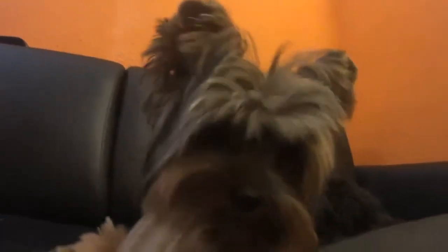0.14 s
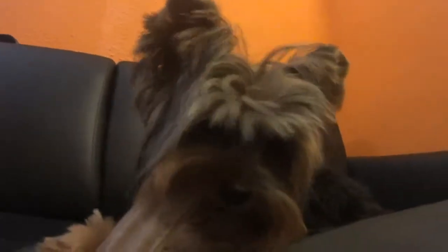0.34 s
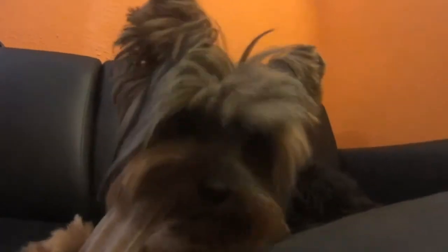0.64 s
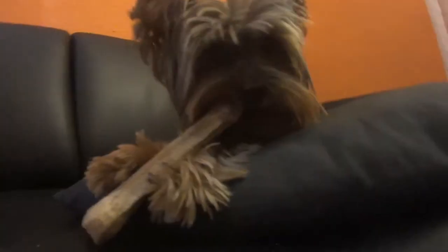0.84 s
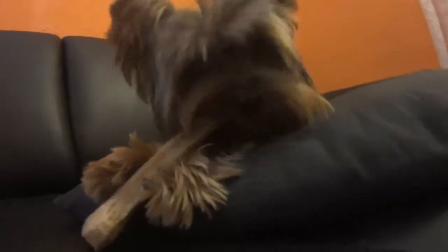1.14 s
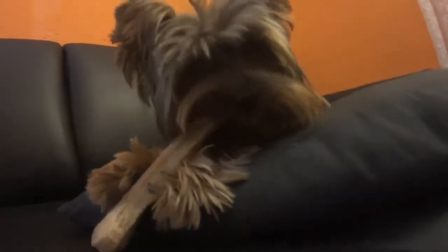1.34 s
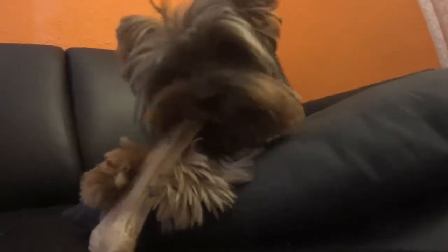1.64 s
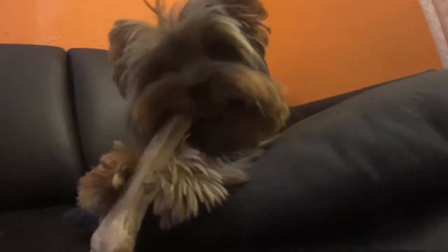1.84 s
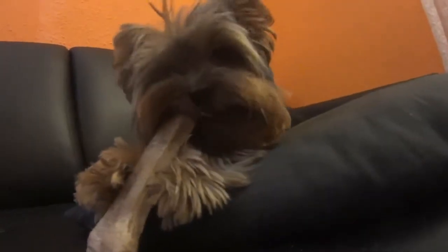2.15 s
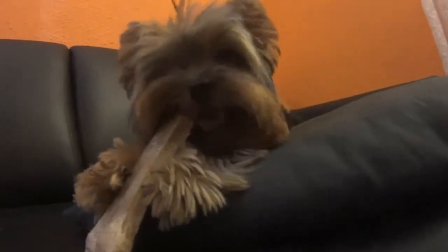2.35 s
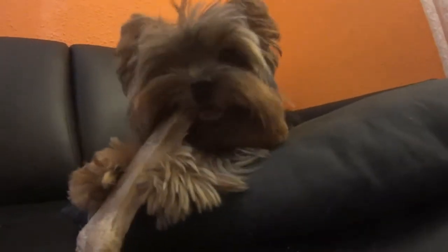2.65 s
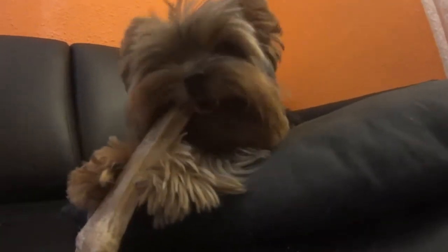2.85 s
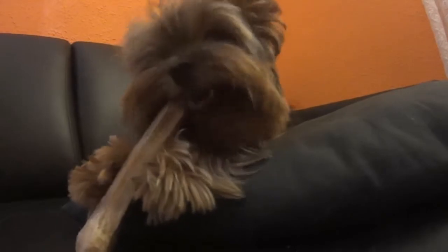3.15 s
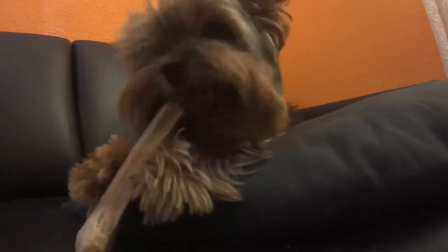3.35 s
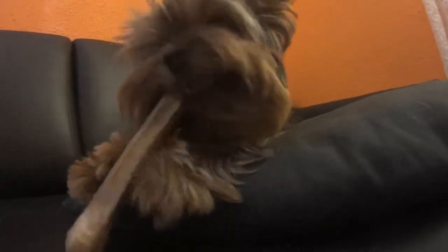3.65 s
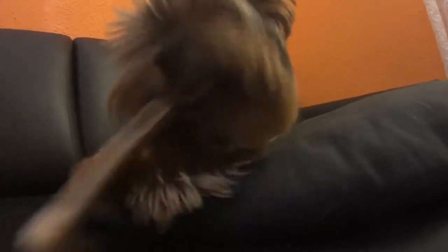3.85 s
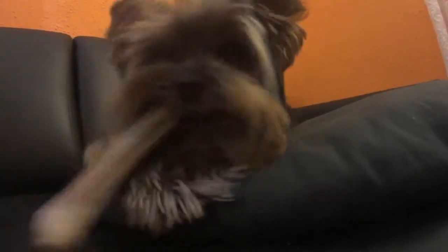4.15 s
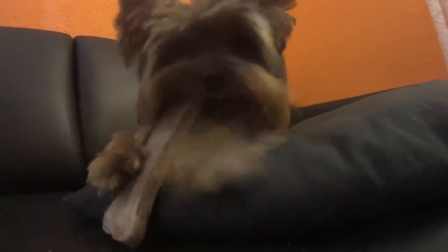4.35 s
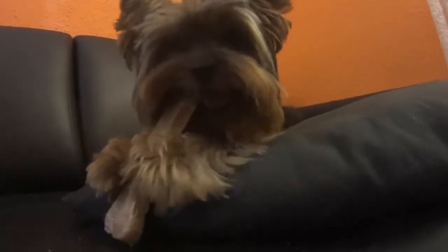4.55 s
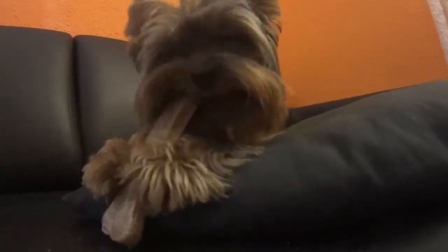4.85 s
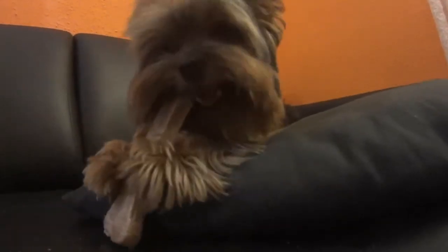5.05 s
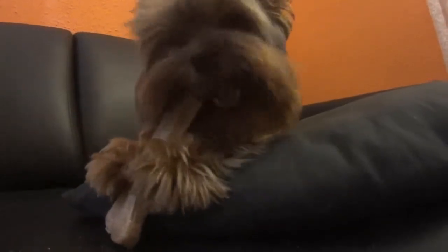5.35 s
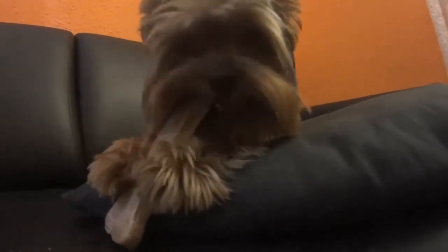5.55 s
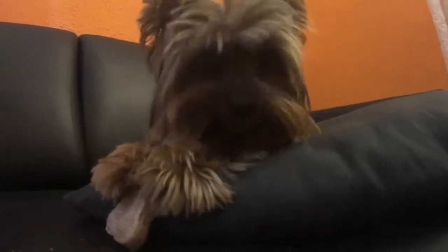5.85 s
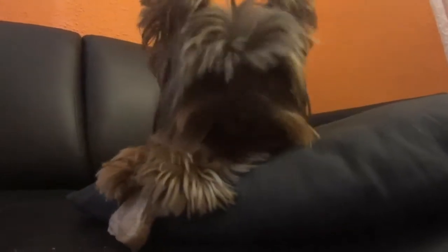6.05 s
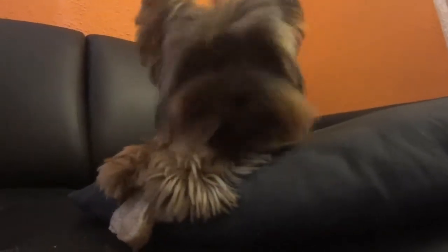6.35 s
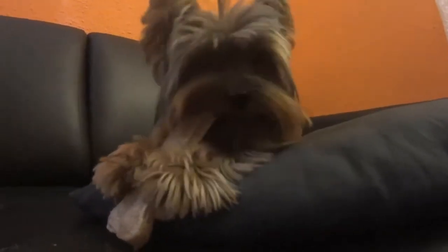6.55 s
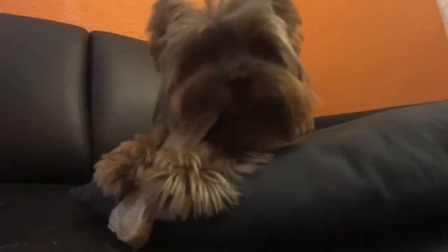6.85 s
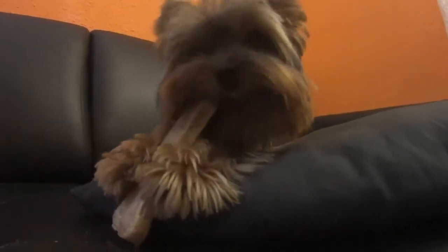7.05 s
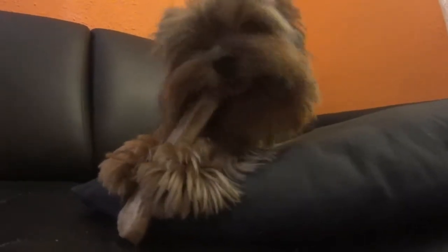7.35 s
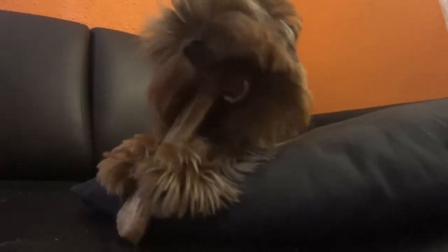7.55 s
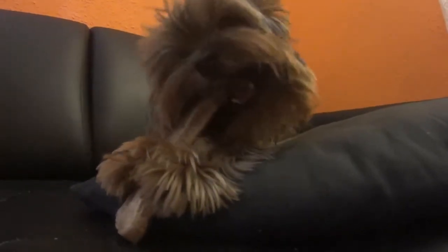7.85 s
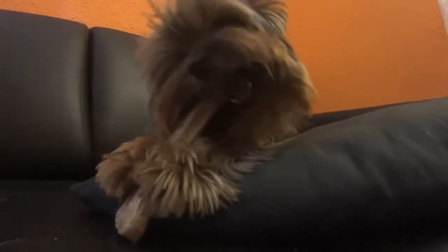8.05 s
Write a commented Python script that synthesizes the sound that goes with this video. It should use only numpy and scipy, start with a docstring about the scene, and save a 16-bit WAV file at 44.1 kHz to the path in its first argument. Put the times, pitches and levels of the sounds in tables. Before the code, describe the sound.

Close, dry tooth clicks and short scrapes on a hard bone, with occasional woody knocks, soft cushion bumps and a constant faint room hiss.

```python
"""On a leather sofa, a small dog gnaws a hard chew bone close by.
Teeth click and grind on the bone: each contact is a few fast cycles that die away at once.
The bone knocks when it slips, made from dying tones. Fur rustles and the cushion rumbles, made
from shaped noise, and soft bumps are short low waves. A steady hiss lies under everything."""
import sys
import numpy as np
from scipy import signal
from scipy.io import wavfile
from scipy.ndimage import uniform_filter1d

SR = 44100
rng = np.random.default_rng(int(sys.argv[2]) if len(sys.argv) > 2 else 0)


def dump(signal):
    """Clip the signal to [-1, 1] and save it as 16-bit WAV at the path in sys.argv[1]."""
    limited = np.clip(np.atleast_2d(signal).T, -1, 1)
    pcm = np.round(limited * 32767).astype(np.int16)
    wavfile.write(sys.argv[1], SR, pcm)


N = 361747  # length in samples

# Steady hiss of the room and the microphone. Each row: pitch in Hz, relative level in dB per Hz.
HISS_SPECTRUM = [(30, -2.5), (130, -18), (300, -12), (640, -11.5), (1000, -11), (1280, -7), (1500, -11),
                 (1950, -9), (2400, -4.5), (2900, -10), (3600, -16), (4900, -16.5), (7100, -24.5),
                 (11000, -25.5)]
HISS_DB = -51.5  # middle of the left and right levels
# How alike left and right are in all noises. Each row: pitch in Hz, likeness from -1 to 1.
LEFT_RIGHT_LIKENESS = [(25, 1), (60, 0.8), (110, 0.88), (190, 0.53), (340, -0.24), (610, -0.556),
                       (1090, -0.092), (1940, 0.54), (4000, 0.393), (11000, 0.467)]

# The dog shifts its weight. Each row: time in seconds, cushion rumble level in dB.
WEIGHT_SHIFTS = [(0.0, -66), (0.84, -71.5), (1.12, -59), (1.55, -62), (2.08, -66.5), (3.3, -59),
                 (4.11, -59.5), (4.61, -72), (5.02, -58.5), (5.3, -64.5), (6.51, -64.5), (6.69, -67.5),
                 (7.54, -62), (7.9, -81), (8.2, -62)]
# Colour of the cushion rumble. Each row: pitch in Hz, relative level in dB per Hz.
RUMBLE_SPECTRUM = [(15, -8.5), (40, -6.5), (100, -7), (220, -9), (350, -17), (700, -79)]
# Paws and chest bump softly into the cushion. Each row: start in seconds, level in dB, pitch in Hz.
CUSHION_BUMPS = [(0.499, -53, 79), (0.617, -53, 57.8), (0.804, -53, 88.8), (1.159, -47.5, 32.3),
                 (1.329, -51, 43.1), (1.839, -54, 40.3), (2.069, -48.5, 133), (2.179, -58, 141),
                 (2.895, -51, 45.8), (3.005, -57, 61.9), (3.181, -47, 33.5), (3.356, -50, 48.4),
                 (3.508, -48, 59.2), (3.898, -48, 95), (4.457, -48.5, 109.5), (4.832, -52, 70.0),
                 (5.175, -45, 149.4), (5.561, -46.5, 60.5), (6.217, -53, 113), (6.524, -52, 102),
                 (6.592, -49, 137), (6.893, -55, 54.3), (7.271, -55, 117.5), (7.388, -49, 89),
                 (7.589, -48.5, 118), (8.159, -52, 59.2)]
BUMP_RISE_TURNS = 0.66  # cycles until the swell of a bump is at its top

# Fur and paws drag on leather. Each row: loudest moment in seconds, swell in seconds,
# fade in seconds, level in dB, brightness from 0 to 1.
LEATHER_RUBS = [(.894, 0.009, .035, -46.5, 0), (1.0, 0.14, 0.27, -52, 0), (1.3, 0.06, 0.046, -44.5, 0.03),
                (1.351, .035, 0.042, -44.5, 0.05), (3.89, 0.076, 0.092, -49.5, 0.92),
                (4.005, 0.068, 0.0926, -37.5, 0.87), (4.325, 0.13, 0.084, -40.5, 0.9),
                (4.39, 0.057, 0.197, -48.5, 0.88)]
# Colour of a dull rub. Each row: pitch in Hz, relative level in dB per Hz.
DULL_RUB_SPECTRUM = [(100, -4), (200, -9), (500, -13.5), (900, -5), (1500, -5.5), (2000, -9), (3000, -26),
                     (6000, -19), (11000, -52)]
# Colour of a bright rub. Each row: pitch in Hz, relative level in dB per Hz.
BRIGHT_RUB_SPECTRUM = [(80, -35), (150, -1.5), (300, -15), (560, -6.5), (940, -33), (1900, -7.5),
                       (2400, 0.5), (2900, -9), (6300, -15), (11000, -28)]
RUB_ENDS_DB, RUB_BEND = -13, 1.5  # both ends of a rub against its top in dB, roundness of the top

# The bone knocks. Each row: start in seconds, thump level in dB, factor on the thump's pitches,
# then the levels of the hollow ring, the clack and the tick in dB against the thump.
BONE_KNOCKS = [(0.093, -41.5, 0.84, -20, -24, -22), (.886, -53.5, 1.22, 5.5, -1, -7),
               (1.025, -49, 1.246, -11, -20, -20), (1.471, -44, 1.43, -4, -9.5, -17),
               (1.7451, -27.5, 0.96, -4, 2, -8), (1.759, -27, 0.75, -16.5, -22.5, -28),
               (1.7683, -48.5, 1.21, -6, 6, -12), (2.62, -41, 1.14, -33, -22, -12),
               (2.627, -42, 1.16, -31.5, -20, -10.5), (3.643, -43, 1.13, -29, -12, -1.5),
               (3.835, -52.5, 1.45, 4, -17, -8), (3.979, -44, 1.4, -20, -15, -10),
               (4.0, -34.5, 1.2, -22, 9, 5.5), (4.013, -46, 1.1, -20.5, -11, -6.5),
               (4.0191, -24.5, 1.075, -34.5, -5, -6), (4.0327, -31, 1.2, -13, -23.5, -7.5),
               (4.134, -44, 0.94, -11, -8, -14.5), (4.952, -47, 0.47, 4, 10.5, -3),
               (5.419, -41, 0.694, -26, -21, -13), (5.815, -25, 1.012, 0.5, -18, -5),
               (5.8252, -44, 1.4, 6, 5, -14), (5.831, -29, 0.9, -17, -12, -28),
               (6.0108, -27.5, 0.99, 0, -9, -10), (6.3448, -22, 0.91, -4, -9.5, -6.5),
               (6.356, -41.5, 0.49, -2.5, -12, -22)]
# Tones of a knock, from low to high, before a knock's own pitch factor. Each row: pitch in Hz,
# level in dB, time to fall by 60 dB in seconds, left over right in dB, left ahead of right in radians.
THUMP_TONES = [(69, -13.5, 0.081, 4.5, .1), (190.3, 11.5, 0.02, 4, 0.41), (239, 1.5, 0.024, -4, 2.2)]
HOLLOW_TONES = [(740, 3.5, 0.02, 8.35, 0.52), (829.4, 3.5, 0.0237, 4.3, 1.9), (935.4, -14, 0.043, 3, 1.4)]
CLACK_TONES = [(1142, -10, 0.0215, 1, 0.86), (1337, 2.5, 0.017, -2.03, 0.94)]
TICK_TONES = [(1874, 4, 0.012, 0, 1.22), (2290, 7, 0.0071, -8.5, 2.34), (2820, 11, 0.0034, -6, 0.114),
              (5330, 4.5, 0.00438, -1.02, .1)]

# How busy the mouth is. Each row: time in seconds, level of the faint ticks in dB.
MOUTH_BUSYNESS = [(0, -69.5), (.45, -63), (.75, -64), (.9, -73.5), (1.8, -60.5), (2.1, -69), (3.0, -63),
                  (4.2, -62), (5.3, -65), (5.9, -67.5), (7.4, -63), (7.7, -69), (8.2, -70)]
# Teeth grind along the bone. Each row: loudest moment in seconds, swell in seconds,
# fade in seconds, level in dB, ring of the mouth in Hz, spread of pitch from 0 to 1.
GRIND_STROKES = [(.38, 0.0128, .02, -51, 5500, .35), (.445, 0.011, 0.042, -60, 5500, .25),
                 (.518, 0.0205, .02, -54, 6100, 0.3), (.55, 0.036, 0.053, -57, 4900, 0.03),
                 (1.825, 0.016, 0.017, -54.5, 5460, 0.2), (2.19, 0.0066, 0.024, -52.5, 4160, 0.42),
                 (2.234, 0.0154, 0.02, -50, 4070, 0.36), (2.641, 0.0268, 0.016, -39.5, 3400, 0.33),
                 (3.022, .019, .013, -42, 3690, 0.35), (3.362, 0.026, 0.013, -47, 3930, 0.32),
                 (3.625, 0.0084, 0.014, -46, 5470, 0.34), (3.797, 0.0117, 0.013, -29, 5010, 0.1),
                 (3.817, 0.0052, .006, -36.5, 5450, 0.22), (3.896, .019, 0.024, -46.5, 4900, 0.4),
                 (3.985, 0.0324, 0.0323, -37.5, 3950, 0.43), (3.995, 0.0083, 0.0082, -36, 4500, 0.25),
                 (4.034, 0.0082, 0.0071, -39.5, 3500, 0.43), (4.38, .014, 0.03, -43, 4450, 0.45),
                 (4.458, 0.012, 0.022, -43, 5400, 0.27), (4.917, 0.015, 0.01, -49, 3530, 0.28)]
# Ends of a grinding stroke against its top in dB, and roundness of the top; flatter than a rub.
STROKE_ENDS_DB, STROKE_BEND = -12, 3.2
# Clear bites of teeth on bone. Each row: loudest moment in seconds, level in dB,
# ring of the mouth in Hz, sharp edge in dB against that ring.
TOOTH_CLICKS = [(.1275, -33.5, 4970, -7.5), (0.3759, -26.5, 5800, -4.5), (.3855, -27.5, 4660, -4),
                (.3972, -35.5, 7570, -11), (0.4446, -42.5, 5300, -9), (.4767, -42, 5080, -3),
                (0.5172, -34.5, 7800, -13), (.5225, -37, 4900, -20), (.5325, -39, 4800, -15),
                (.5412, -39, 4700, -25), (.5447, -38, 4700, -25), (.5527, -36, 4900, -3.5),
                (0.5602, -39, 4700, -25), (0.5682, -35, 4900, -12), (.5795, -34, 5100, -13.5),
                (.6186, -35.5, 5860, -21), (.627, -32.5, 4650, -21), (.6505, -40, 4600, -2),
                (.6741, -38.5, 4820, -6.5), (.7032, -36, 3700, -24), (.725, -39.5, 4300, -23),
                (.738, -45, 6910, -20), (.7458, -40.5, 4680, -20), (1.2707, -21.5, 4400, -25),
                (1.3667, -30.5, 5050, -10), (1.756, -35.5, 5200, 0), (1.9779, -38.5, 5100, -17),
                (2.0428, -34.5, 2050, -26), (2.0426, -36, 5200, -20), (2.1927, -36, 4300, -18),
                (2.2255, -34, 4360, -21.5), (2.3766, -27.5, 5000, -36), (2.413, -27.5, 5030, -17.5),
                (2.462, -24.5, 5300, 2), (2.5178, -34, 5100, -9), (2.5622, -24, 5140, -14),
                (2.594, -42.5, 4400, -25), (2.605, -25, 4300, -20), (2.6415, -18, 3100, -11),
                (2.7374, -24.5, 4420, -16), (2.8166, -36, 4760, -9), (2.8367, -35, 4660, -14),
                (2.8962, -26, 5030, -22), (2.906, -39.5, 5500, -22), (2.9309, -38, 5060, -22),
                (2.989, -40, 4600, -25), (3.013, -38, 4370, -21), (3.026, -27.5, 4860, -13),
                (3.073, -33, 3750, -25), (3.2358, -25, 4850, -20), (3.2873, -33, 4800, -27),
                (3.3661, -17.5, 3640, -14), (3.4553, -34.5, 4240, -1), (3.4683, -36, 4900, -18),
                (3.6258, -28, 6290, -14.5), (3.6393, -34, 5240, -12), (3.6493, -31, 3840, -12.5),
                (3.698, -19, 5000, -11.5), (3.701, -22, 6150, -14), (3.711, -29, 5300, -23),
                (3.7615, -29, 5450, -14.5), (3.7887, -21, 5500, -15), (3.7914, -14.5, 5100, -13),
                (3.794, -20, 5300, -2), (3.7963, -14, 5060, -7), (3.7994, -16, 5250, -10),
                (3.8036, -25.5, 5320, -7.5), (3.8078, -20.5, 5170, -12), (3.8106, -28, 5000, -13),
                (3.8145, -34.5, 6000, -14), (3.8804, -37, 8200, -1), (3.8986, -29, 5770, -17),
                (3.9224, -29.5, 4320, -26), (3.928, -37, 3900, -12), (3.974, -27, 5400, -20),
                (3.981, -22.5, 6450, -7), (3.989, -23, 4820, -22), (3.9958, -20.5, 5050, -16),
                (4.0106, -21.5, 5260, -18), (4.0182, -23, 2740, -25), (4.023, -23, 4520, -24.5),
                (4.0345, -30, 4620, -20), (4.1358, -38.5, 5270, -9.5), (4.1618, -41.5, 4900, -15),
                (4.3723, -33, 3000, -7.5), (4.3803, -28.5, 3550, -3), (4.5629, -33.5, 2650, -7.5),
                (4.6423, -39.5, 5940, 2), (4.7299, -42.5, 5100, 5), (4.8313, -21, 5256, -14.5),
                (4.8903, -23.5, 4500, -31), (4.901, -30, 4600, -25), (4.9224, -22.5, 4810, -19.5),
                (4.9233, -22.5, 3003, -30), (4.992, -38.5, 4600, -25), (5.003, -42, 4700, -25),
                (5.0729, -35.5, 3360, -23), (5.098, -40, 5200, 6.5), (5.22, -44.5, 5000, -20),
                (5.2768, -33, 4800, -16), (5.284, -41, 4470, -22), (5.3416, -37.5, 7000, -2),
                (5.716, -32, 3630, -7), (5.7811, -41.5, 7670, 4), (5.9085, -27, 5245, -30),
                (6.1554, -37, 4800, -24), (6.6068, -35, 5030, -24), (6.678, -33, 4640, -23),
                (6.677, -34.5, 2350, -22.5), (6.753, -43, 5070, -5), (6.918, -42, 5810, 7),
                (6.927, -36, 5140, -5), (7.0564, -35, 4650, -4), (7.1963, -33, 4440, -19),
                (7.2024, -36.5, 5810, -2), (7.3507, -33.5, 4920, -12), (7.367, -35.5, 3160, -21),
                (7.5465, -32, 3500, -13)]

EDGE_HZ = 11000  # the recorder keeps little above this


def gain_of(db):
    """Turns decibels into a multiplier."""
    return 10 ** (np.asarray(db) / 20)


def evened(x):
    """Scales a signal to an average strength (rms) of 1."""
    return x / np.sqrt(np.mean(x ** 2) + 1e-20)


def read(points, hz):
    """Reads a curve over pitch, with the pitch axis logarithmic as in hearing."""
    f, value = np.transpose(points)
    return np.interp(np.log(hz + 1), np.log(f + 1), value)


def level_over_time(points):
    """Gain that follows straight lines in dB between the given moments."""
    return gain_of(np.interp(np.arange(N) / SR, *np.transpose(points)))


def add(mix, s, sound):
    """Adds a sound into the mix from s seconds on, cut off at the end of the mix."""
    part = mix[..., round(s * SR):][..., :sound.shape[-1]]
    part += sound[..., :part.shape[-1]]


def scatter_in(length, at, sounds):
    """Sums rows of sound into one track, each starting at its own sample."""
    places = at[:, None] + np.arange(sounds.shape[1])
    return np.bincount(places.ravel(), sounds.ravel(), minlength=length)[:length]


def noise(spectrum, patchy_db, size):
    """Two-channel noise of rms 1 from random short-time spectra with drifting patches."""
    hz = np.fft.rfftfreq(size, 1 / SR)
    a, b, c, d, patches = rng.standard_normal((4 * N // size + 5, len(hz), 5)).T
    patches = uniform_filter1d(patches, size=8, axis=0)  # smooth over pitch
    patches = evened(uniform_filter1d(patches, size=8, axis=1))  # and over time
    same = np.clip(read(LEFT_RIGHT_LIKENESS, hz), -1, 1)[:, None]
    left = a + 1j * b
    right = same * left + np.sqrt(1 - same ** 2) * (c + 1j * d)
    spectra = np.array([left, right])
    spectra *= gain_of(read(spectrum, hz)[:, None] + patchy_db * patches)
    return evened(signal.istft(spectra, nperseg=size, noverlap=3 * size // 4)[1][:, :N])


def lumps(per_s, spread_db):
    """A gain of rms 1 that wanders up and down, with per_s random levels a second."""
    knots = rng.standard_normal(round(N / SR * per_s) + 2)
    wander = np.interp(np.arange(N) / SR * per_s, np.arange(len(knots)), knots)
    return evened(gain_of(spread_db * wander))


def stroke(s, swell_s, fade_s, db, ends_db, bend):
    """Start and gain of one stroke that swells to its loudest moment and fades."""
    t = np.arange(-swell_s, fade_s, 1 / SR)
    away = np.where(t < 0, -t / swell_s, t / fade_s)  # 0 at the top, 1 at the ends
    gain = gain_of(db + ends_db * away ** bend)
    return s - swell_s, gain * signal.windows.tukey(len(t), .1)


def swell(u):
    """Rises smoothly to 1 at u = 1, then dies away."""
    return (u * np.exp(1 - u)) ** 2


def ping(hz, rise_s, phase):
    """A short tone that swells in rise_s and dies away; one row for each pitch given."""
    t = np.arange(220) / SR
    return swell(t / rise_s) * np.cos(2 * np.pi * np.c_[hz] * t + np.c_[phase])


def ring(modes, rise_s, delay_s, factor=1):
    """Dying tones with their own level and phase at each microphone port; tighter is higher, longer."""
    t = np.maximum(np.arange(3000) / SR - delay_s, 0)
    side = np.array([[.5], [-.5]])  # left, right
    total = 0
    for hz, db, t60, pan_db, lead in modes:
        fading_db = db + side * pan_db - 60 * t / (t60 * factor ** 1.87)
        total = total + gain_of(fading_db) * np.sin(2 * np.pi * hz * factor * t + side * lead)
    return (1 - np.exp(-(t / rise_s) ** 2)) * total


def chatter(length, hz, scatter, per_s, spread_db):
    """A random train of tiny slips of uneven size, pitched around hz; rms 1."""
    at, size, up, down, phase = rng.random((round(length / SR * per_s) + 1, 5)).T
    at = (at * length).astype(int)
    off = 2.04 * scatter * (up - down)
    db = -spread_db * np.log(size + 0.0028) - 3.1 * off  # higher slips are smaller
    pitch = np.minimum(hz * np.exp(off), 10500)
    slips = np.c_[gain_of(db)] * ping(pitch, 0.00029, 2 * np.pi * phase)
    return evened(scatter_in(length, at, slips))


def nearby(x, t60):
    """Reflections off cushions and wall: sparse taps of random sign, other ones for each port."""
    t = np.arange(40, 3000) / SR
    signs = rng.choice([-1., 1.], (2, len(t)))
    present = rng.random((2, len(t))) < .08
    taps = signs * present * gain_of(-60 * t / t60)
    taps = np.pad(taps / np.linalg.norm(taps[0]), ((0, 0), (40, 0)))  # silent before the first
    return signal.oaconvolve(x[None], taps, axes=1)[:, :N]


def hiss():
    """The steady noise of the room and the microphone, a little louder on the right."""
    level = gain_of(HISS_DB + np.array([[-.4], [.4]]))
    return level * noise(HISS_SPECTRUM, patchy_db=1.4, size=1024)


def rumble():
    """The cushion gives in soft low lumps as the dog shifts."""
    low_noise = noise(RUMBLE_SPECTRUM, patchy_db=-0.5, size=2048)
    return level_over_time(WEIGHT_SHIFTS) * lumps(per_s=51, spread_db=3.5) * low_noise


def bumps():
    """Each bump is one slow push of the cushion and its rebound."""
    out, t = np.zeros(N), np.arange(4000) / SR
    for (s, db, hz), phase in zip(CUSHION_BUMPS, rng.random(len(CUSHION_BUMPS))):
        wave = np.cos(2 * np.pi * (hz * t + phase))
        add(out, s, gain_of(db) * swell(t * hz / BUMP_RISE_TURNS) * wave)
    return out


def rustle():
    """Rough friction noise; each rub has its own brightness, blended from a dull and a bright noise."""
    power = np.zeros((2, N))  # dull, bright
    for *shape, brightness in LEATHER_RUBS:
        start, gain = stroke(*shape, RUB_ENDS_DB, RUB_BEND)
        add(power, start, np.clip([[1 - brightness], [brightness]], 0, 1) * gain ** 2)
    dull = noise(DULL_RUB_SPECTRUM, patchy_db=1.5, size=256)
    bright = noise(BRIGHT_RUB_SPECTRUM, patchy_db=1.5, size=512)
    friction = np.sqrt(power[0]) * dull + np.sqrt(power[1]) * bright
    return lumps(per_s=280, spread_db=2.5) * friction


def knocks():
    """The tick of contact comes first; the slower parts answer about half a millisecond later."""
    out = np.zeros((2, N))
    # the bone is never held twice alike, so the pitches shift slightly
    grips = 1 + 0.013 * rng.uniform(-0.68, 1, (len(BONE_KNOCKS), 3))
    for (s, db, factor, hollow_db, clack_db, tick_db), grip in zip(BONE_KNOCKS, grips):
        knock = ring(THUMP_TONES, 0.0027, 0.0005, factor)
        knock += gain_of(hollow_db) * ring(HOLLOW_TONES, 0.00062, 0.00059, grip[0])
        knock += gain_of(clack_db) * ring(CLACK_TONES, 0.00062, 0.00043, grip[1])
        knock += gain_of(tick_db) * ring(TICK_TONES, .0001, 0, grip[2])
        add(out, s, gain_of(db) * knock)
    return out


def chewing():
    """Faint wet ticks of the mouth, a random train whose level follows how busy it is."""
    ticks = chatter(N, hz=5000, scatter=.2, per_s=450, spread_db=3.5)
    return level_over_time(MOUTH_BUSYNESS) * lumps(per_s=10, spread_db=0.5) * ticks


def grinding():
    """Teeth dragged along the bone slip in dense bursts."""
    out = np.zeros(N)
    for *shape, hz, scatter in GRIND_STROKES:
        start, gain = stroke(*shape, STROKE_ENDS_DB, STROKE_BEND)
        add(out, start, gain * chatter(len(gain), hz, scatter, per_s=4000, spread_db=2.6))
    return out


def clicks():
    """Each tooth contact rings the mouth briefly, with a sharper edge above and the bone below."""
    s, db, hz, edge_db = np.transpose(TOOTH_CLICKS)
    r = rng.random((len(s), 9)).T
    turn = 2 * np.pi  # one full cycle of phase
    sound = ping(hz, 0.00036, turn * r[0])
    sound += gain_of(-24) * ping(hz * (1.2 + 0.3865 * r[1]), 0.0012, turn * r[2])  # weak after-ring
    sound += np.c_[gain_of(edge_db)] * ping(6900 + 2000 * r[3], 0.00012, turn * r[4])  # sharp edge
    bone_gain = np.c_[gain_of(-25 + 9 * r[5])]
    sound += bone_gain * ping(2000 + 1300 * r[6], 0.00067, turn * r[7])
    sound *= np.c_[gain_of(db)]
    at = np.round((s - .00045) * SR).astype(int)  # start early, so the top falls near s
    skip = at + np.round((0.00096 + 0.0046 * r[8]) * SR).astype(int)  # the tooth skips once more
    return scatter_in(N, at, sound) + gain_of(-18.5) * scatter_in(N, skip, sound * np.c_[r[7]])


def scene():
    """Background, sofa, bone and mouth together; mouth and bone also reflect off things nearby."""
    background = hiss() + rumble() + bumps() + rustle()
    blows = knocks()
    bone = blows + gain_of(-9.5) * nearby(blows.mean(0), t60=0.081)
    mouth = chewing() + grinding() + clicks()
    dog = mouth * gain_of([[-.6], [.6]]) + gain_of(-10.5) * nearby(mouth, t60=0.014)
    return background + bone + dog


def record(dry):
    """The band limit of the recorder: a filter that takes away the highest treble."""
    low_pass = signal.firwin(161, EDGE_HZ, window=("kaiser", 4), fs=SR)
    return signal.oaconvolve(dry, low_pass[None], "same")


dry = scene()
out = record(dry)
dump(out)
```